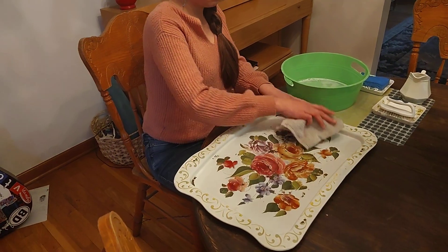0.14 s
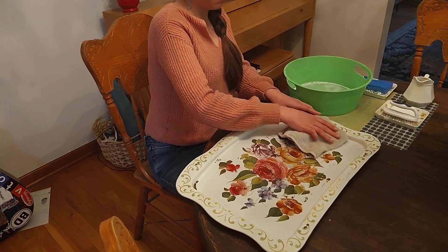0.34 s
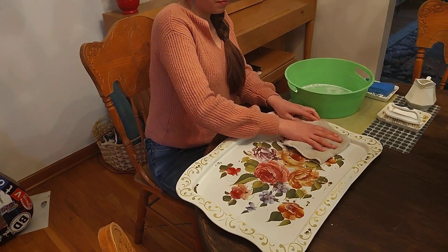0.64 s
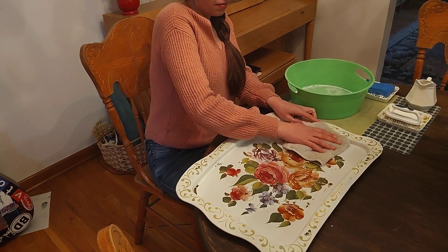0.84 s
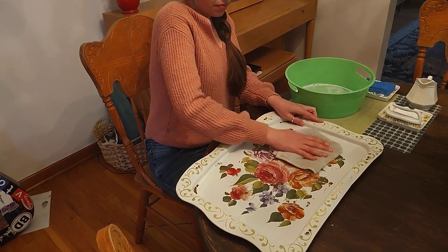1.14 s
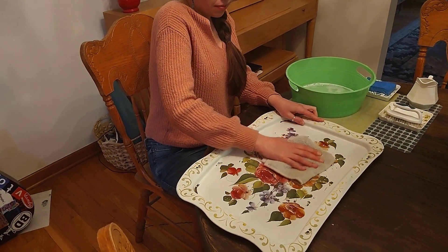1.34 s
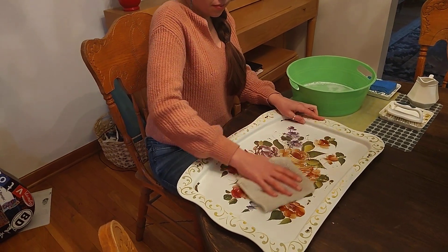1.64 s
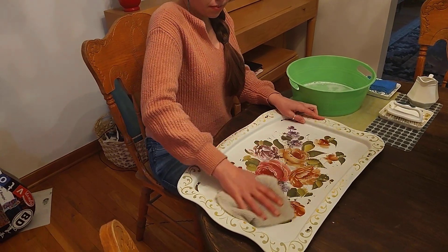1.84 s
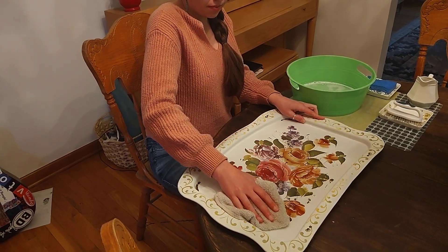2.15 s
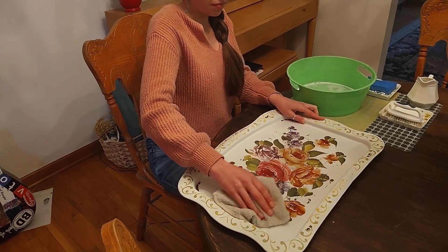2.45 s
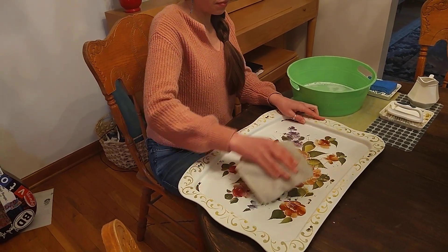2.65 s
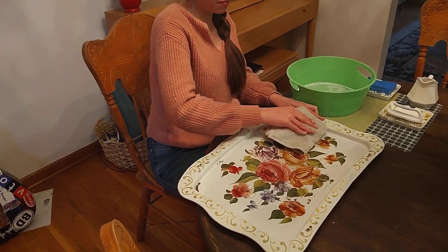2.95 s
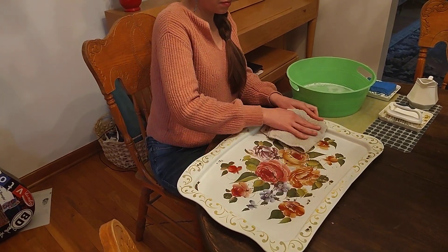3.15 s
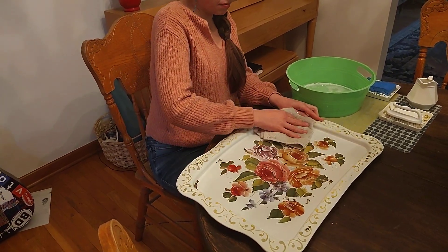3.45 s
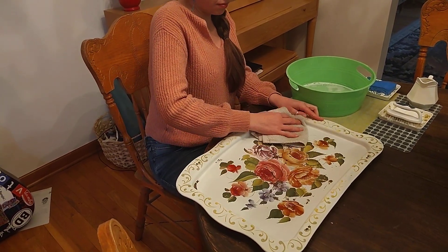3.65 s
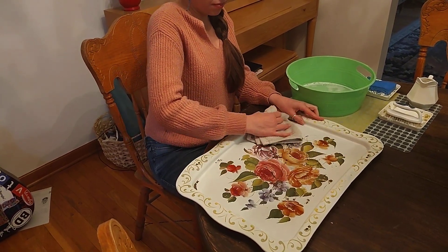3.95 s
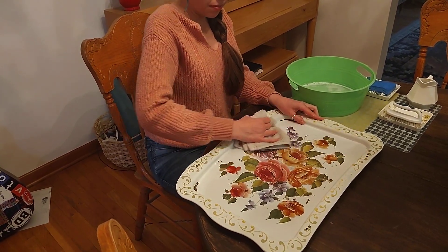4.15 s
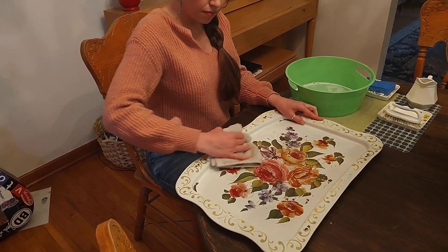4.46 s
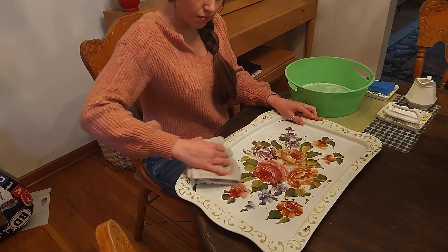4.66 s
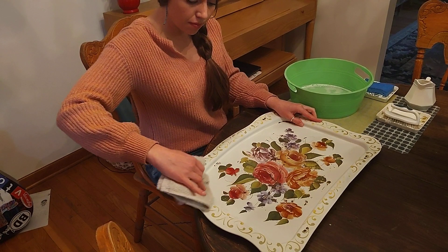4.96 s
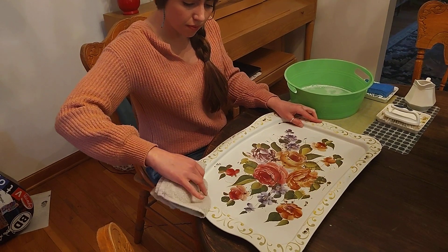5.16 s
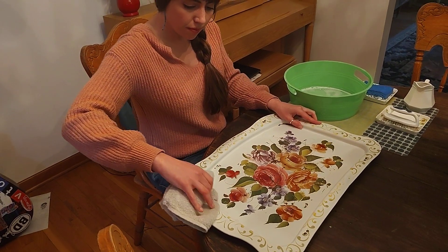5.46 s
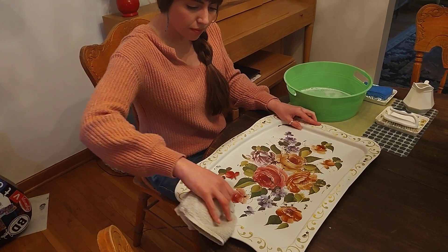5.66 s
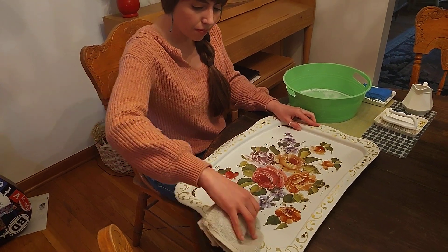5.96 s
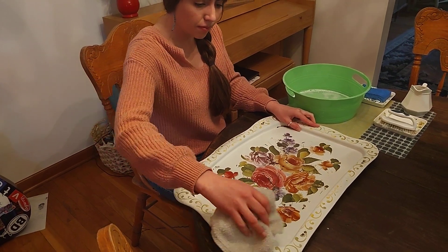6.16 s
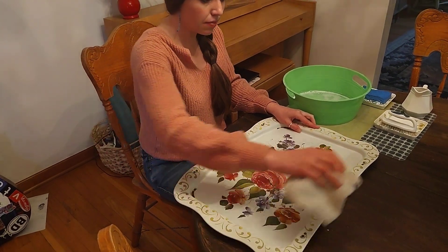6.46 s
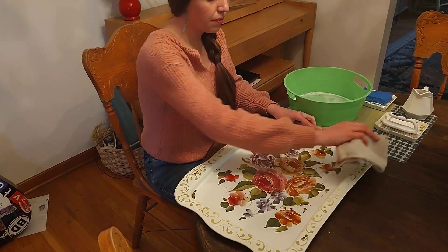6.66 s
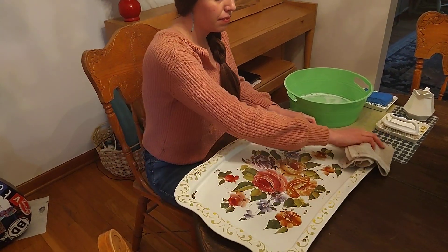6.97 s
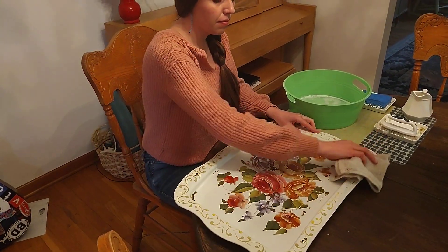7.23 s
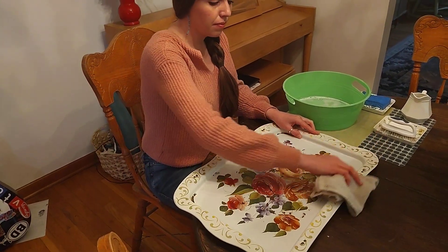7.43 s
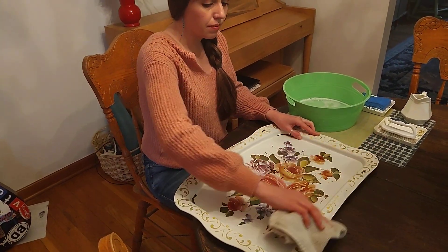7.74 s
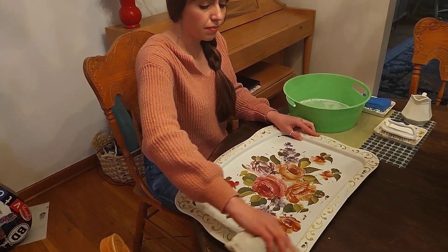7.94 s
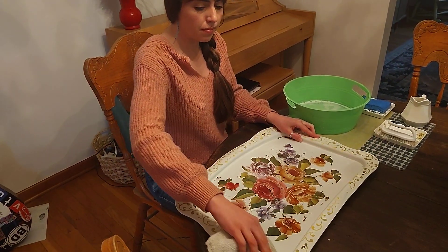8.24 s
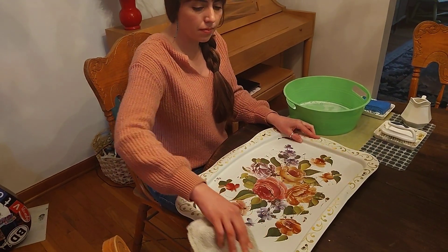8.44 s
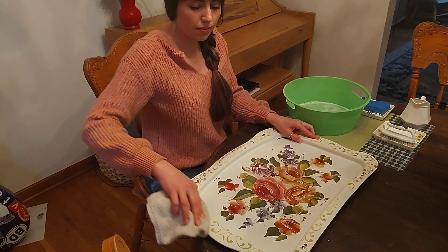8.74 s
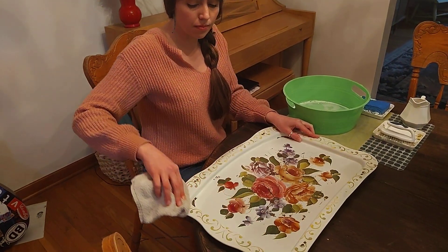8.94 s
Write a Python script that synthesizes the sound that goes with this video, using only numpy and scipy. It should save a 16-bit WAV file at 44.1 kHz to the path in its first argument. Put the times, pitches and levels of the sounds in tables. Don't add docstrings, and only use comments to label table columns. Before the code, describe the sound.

A quiet wooden room with faint low hum and soft hiss, heard closely in stereo, treble leaning right. For the first second a dry cloth barely whispers over a painted metal tray, with tiny ticks. From about 1.1 s the strokes swell into a strong, grainy hiss; a sharp snag snaps at 1.3 s, and around 1.6 to 1.85 s the sheet clanks, booms and rattles on the table. Rubbing drops away from 2 s, nearly still until small ticks at 3.15 s and a hard, bright knock near 3.4 s. Another dull clank and landing come at 4.2 s with a burst of wiping. Then softer, airier swishes follow the rim, with ticks at 5.05 and 6.1 s, a lull, a low thud at 6.9 s, steady light rubbing from 7.2 s, a knock and thud at 8.05 s, and last brushes and ticks near 8.9 s.

```python
import sys
import numpy as np
from scipy import signal
from scipy.fft import rfft, irfft
from scipy.io import wavfile
from scipy.ndimage import uniform_filter1d

SR = 44100
rng = np.random.default_rng(int(sys.argv[2]) if len(sys.argv) > 2 else 0)


def boost_factor(decibels):
    exponent = np.asarray(decibels, float) / 20
    return 10 ** exponent


def transcribe(signal):
    frames = np.atleast_2d(signal).T
    limited = np.clip(frames, -1, 1)
    pcm = np.round(limited * 32767).astype(np.int16)
    wavfile.write(sys.argv[1], SR, pcm)


N = 401310
SPAN = 2 ** 15


def evened(x):
    return x / np.sqrt(np.mean(x ** 2) + 1e-20)


def read(points, hz):
    f, value = np.transpose(points)
    return np.interp(np.log(hz + 1), np.log(f + 1), value)


def causal(points, size=4096):
    half_db = np.maximum(read(points, np.fft.rfftfreq(size, 1 / SR)), -60)
    half = half_db * np.log(10) / 20
    log_gain = np.r_[half, half[-2:0:-1]]
    taps = np.fft.ifft(np.exp(np.conj(signal.hilbert(log_gain)))).real[:size // 2]
    return taps / np.linalg.norm(taps)


def bell(hz, centre_hz, width_hz):
    return 1j * hz * width_hz / (centre_hz ** 2 - hz ** 2 + 1j * hz * width_hz)


def add(mix, s, sound):
    part = mix[:, round(s * SR):][:, :sound.shape[1]]
    part += sound[:, :part.shape[1]]


# (frequency [Hz], correlation)
MIC_LIKENESS = [(60, 0.94), (150, 0.95), (380, 0.71), (950, 0.25), (2380, 0.06), (5980, 0.027),
                (15000, 0.02)]


def pair_noise(field_db, size=512):
    hop = size // 2
    hz, t = np.fft.rfftfreq(size, 1 / SR), np.arange(N // hop + 5) * hop / SR
    a, b, c, d = rng.standard_normal((len(t), len(hz), 4)).T
    same = np.clip(read(MIC_LIKENESS, hz), -1, 1)[:, None]
    left = a + 1j * b
    right = same * left + np.sqrt(1 - same ** 2) * (c + 1j * d)
    z = np.array([left, right]) * boost_factor(field_db(hz[:, None], t))
    return signal.istft(z, window="cosine", nperseg=size, noverlap=size - hop)[1][:, :N]


# (frequency [Hz], level [dB per Hz])
ROOM_HISS = [(25, -30), (50, -19.5), (85, -5.5), (130, -7), (250, 0.5), (330, -3.5), (430, -4.5), (620, -9),
             (1000, -19.5), (1800, -17), (2600, -20), (5000, -24.5), (10000, -25.5), (16000, -25)]
# (frequency [Hz], level [dB])
APPLIANCE_HUM = [(91.5, -86), (258.4, -86), (296.1, -76), (355.3, -81), (414.5, -89)]


def quiet_room():
    t = np.arange(N) / SR
    hiss = pair_noise(lambda hz, frames: read(ROOM_HISS, hz) + 0 * frames, size=2048)
    floor = boost_factor(-69.5 - 5.5) * evened(hiss)
    pole = np.exp(-np.pi * 6 / SR)
    for hz, db in APPLIANCE_HUM:
        waver = .35 * evened(signal.lfilter([1], [1, -pole], rng.standard_normal((2, N))))
        in_phase = (1 + waver[0]) * np.cos(2 * np.pi * hz * t)
        floor = floor + boost_factor(db + 3.5) * (in_phase + waver[1] * np.sin(2 * np.pi * hz * t))
    return floor


# (start [s], end [s], fibre hiss at start [dB], at end [dB],
# pressure as sheet hiss [dB])
HAND_STROKES = [(0.0, 0.28, -76, -78, -70), (0.28, 0.88, -83, -86, -76), (0.88, 1.125, -83, -57, -65),
                (1.125, 1.4, -53, -50, -56.5), (1.4, 1.62, -48, -49, -50.5), (1.62, 1.955, -47, -56, -56),
                (1.955, 2.2, -72, -77, -76), (2.2, 2.55, -71, -76, -73), (2.55, 3.35, -77, -80, -80),
                (3.35, 3.6, -64, -71, -57), (3.6, 4.18, -71, -60, -68), (4.18, 4.43, -56, -57, -58.5),
                (4.43, 5.05, -57, -59, -69), (5.05, 5.5, -68, -61, -70), (5.5, 6.095, -60, -63, -71.5),
                (6.095, 6.92, -75, -76, -82), (6.92, 7.25, -75, -66, -72), (7.25, 8.0, -63, -63.5, -73),
                (8.0, 8.2, -62, -68, -66), (8.2, 8.85, -69, -56, -73), (8.85, 9.1, -60, -66, -73)]


def hand(t):
    arch_db, follow, change_s = 1.5, 0.3, 0.03
    strokes = np.transpose(HAND_STROKES)
    now = np.clip(np.searchsorted(strokes[0], t) - 1, 0, None)
    start, end, first_db, last_db, sheet_db = strokes[:, now]
    u = np.clip((t - start) / (end - start), 0, 1)
    move_db = (last_db - first_db) * (u - .5) + arch_db * np.sin(np.pi * u)
    levels = np.array([(first_db + last_db) / 2 + move_db, sheet_db + follow * move_db])
    return uniform_filter1d(levels, max(round(change_s / (t[1] - t[0])), 1), axis=1)


# (frequency [Hz], level [dB], t60 [s])
TRAY_MODES = [(131, -10, 0.17), (161.7, -15, 0.35), (207, -16.5, 0.11), (240, -11.5, 0.59),
              (320, -6.5, 0.099), (345, -8, 0.12), (419.1, -14, 0.19), (486.8, -13.5, 0.054)]


def tray_ring(share_db=-3.):
    t = np.arange(SR // 2) / SR
    modes = 0
    for hz, db, t60 in TRAY_MODES:
        modes = modes + boost_factor(db - 60 * t / t60) * np.sin(2 * np.pi * hz * t) / np.sqrt(t60)
    return (t == 0) + boost_factor(share_db) * modes / np.sqrt(SR) * 4


# (frequency [Hz], level [dB per Hz])
FIBRE_HISS = [(1100, -22), (1800, 2.5), (2500, -5), (3000, 3.5), (4100, 1.5), (4900, 3), (8800, 0.5),
              (11000, -1.5), (13000, -5.5), (15800, -11.5)]
# (frequency [Hz], level [dB])
SHEET_COLOUR = [(400, -29), (700, -6.5), (1100, -1), (1600, -1), (2000, -2), (2600, -10.5), (3600, -20.5)]
# (frequency [Hz], level [dB])
ROCK_COLOUR = [(60, -40.5), (100, -8.5), (140, -6.5), (210, -3.5), (330, -14.5), (500, -12), (800, -11),
               (1200, -36.5)]


def wipe(flicker_db=0.8, grit_db=1.5, patchy_db=1.1):
    def hiss(hz, t):
        patches = uniform_filter1d(rng.standard_normal((len(t), len(hz))).T, 8, 0)
        patches = evened(uniform_filter1d(patches, 10, 1))
        flicker = evened(uniform_filter1d(rng.standard_normal(len(t)), 3))
        fibre_db, sheet_db = hand(t)
        tilt = -3.1 - 0.4 * (sheet_db - fibre_db)
        fibres = read(FIBRE_HISS, hz) + fibre_db + tilt * np.log2(np.clip(hz, 1500, 16000) / 6000)
        fibres = fibres + 1.2 * np.minimum(tilt, 0) * np.log2(np.maximum(hz, 8000) / 8000)
        flat = read(SHEET_COLOUR, hz / 0.72) + np.where(t < 5.3, -1.5, -60)
        rim = read(SHEET_COLOUR, hz / 1.22)
        sheet = np.maximum(rim, flat) + sheet_db + 9.5
        both = 10 * np.log10(boost_factor(2 * fibres) + boost_factor(2 * sheet))
        return both + 2.74 + patchy_db * patches + flicker_db * flicker

    catches = uniform_filter1d(rng.exponential(1, N), 12)
    grit = evened(boost_factor(grit_db * catches * 4.4))
    rocking = pair_noise(lambda hz, t: read(ROCK_COLOUR, hz) + 0 * t, size=2048)
    rocking = evened(signal.oaconvolve(rocking, tray_ring(44.0)[None])[:, :N])
    rock_db, rock_per_db, rock_thud_db, rock_t60, deep_hz = -79.5, 0.65, -13, 1.6, 185
    t = np.arange(0, N / SR, .002)
    power = boost_factor(2 * (rock_db + rock_per_db * (hand(t)[1] + 72)))
    for s, boom_db, pitch_hz, _, _ in LANDINGS:
        fading_db = boom_db + rock_thud_db - 60 * abs(t - s) / rock_t60
        power = power + (t > s) * (pitch_hz < deep_hz) * boost_factor(2 * fading_db)
    rock_level = np.interp(np.arange(N) / SR, t, np.sqrt(power))
    return grit * pair_noise(hiss) / 18.7 + rocking * rock_level


# (frequency [Hz], t60 [s])
ROOM_DECAY = [(100, 0.2), (300, 0.77), (1000, 0.37), (3000, 0.3), (7000, 0.3), (14000, 0.29)]
# (delay [s], level [dB])
FIRST_ECHOES = [(.0021, -12), (.0037, -11), (.0075, -14), (.0128, -15)]


def room_tails(count=6, tail_db=3.5):
    taps = np.zeros((count, 2, SPAN // 2 + 8192))
    slots = np.arange(24, taps.shape[2] - 20, 4)
    at = slots + rng.integers(0, 4, (count, 2, len(slots)))
    np.put_along_axis(taps, at, rng.choice([-1., 1.], at.shape), 2)
    hz, t, z = signal.stft(taps, SR, nperseg=512)
    same = np.clip(read(MIC_LIKENESS, hz), -1, 1)[:, None]
    z[:, 1] = same * z[:, 0] + np.sqrt(1 - same ** 2) * z[:, 1]
    decay = boost_factor(-60 * t / read(ROOM_DECAY, hz)[:, None])
    tails = signal.istft(z * decay, SR, nperseg=512)[1][..., :taps.shape[2]]
    tails *= np.minimum(np.arange(taps.shape[2]) / 90, 1)
    tails *= boost_factor(tail_db) / np.linalg.norm(tails[:, :1], axis=2, keepdims=True)
    for delay, db in FIRST_ECHOES:
        where = np.round(delay * SR * rng.uniform(0.74, 1.2, (count, 2, 1))).astype(int)
        np.put_along_axis(tails, where, boost_factor(db), 2)
    return rfft(tails, SPAN)


# (time [s], snap [dB], sheet clank [dB], treble over snap [dB])
RIM_SNAGS = [(0.0159, -61, -80, -24), (0.512, -45.5, -56, -11), (1.1278, -26.5, -41, -12.5),
             (1.3172, -14.5, -28.5, -13.5), (1.6834, -28, -42, -17), (1.8453, -21, -55, -16),
             (2.5044, -46.5, -70, -11.5), (3.142, -44, -48, -13), (3.1623, -34.5, -40, -14.5),
             (3.5595, -32, -57, -14), (4.1697, -28.5, -42, -17), (4.2433, -28.5, -47, -14),
             (4.331, -31.5, -50, -15), (4.4612, -34, -55, -11), (4.9646, -43, -53, -17),
             (5.0452, -26, -47, -9.5), (6.096, -23, -43, -9.5), (6.244, -46.5, -69, -8.5),
             (6.276, -56.5, -75, -12), (7.014, -35, -54, -17), (7.1916, -39, -57, -14.5),
             (7.4016, -46, -63, -13), (7.463, -31, -53, -13), (7.5602, -30, -48, -10.5),
             (7.9992, -24.5, -43, -14), (8.8367, -30, -49, -9), (8.894, -30.5, -48.5, -9.5)]
# (time [s], snap [dB], clank [dB], clank centre [Hz])
SHEET_CLANKS = [(0.094, -75, -57, 1000), (0.289, -61, -46.5, 1600), (0.323, -62, -48, 1300),
                (0.5977, -70, -45.5, 1300), (1.617, -14.5, -26, 1750), (1.6545, -21.5, -29, 1080),
                (1.8534, -27.5, -34, 1500), (3.213, -56.5, -42.5, 1680), (3.267, -52.5, -48, 1630),
                (3.321, -53, -54, 1620), (3.3517, -26.5, -32.5, 1350), (3.6984, -55, -42, 1350),
                (3.8894, -58, -49, 1300), (3.9074, -44, -40, 1610), (3.919, -33.5, -38, 1500),
                (4.185, -21, -22.5, 1000), (4.1998, -40, -26, 1550), (5.73, -56, -50.5, 1700),
                (6.9196, -35, -41.5, 1650), (8.0263, -21.5, -32, 1800), (8.0546, -33, -33, 1350),
                (8.79, -58, -55, 1600)]
# (time [s], snap [dB], clank [dB], clank centre [Hz])
RIM_KNOCK = (3.3786, -5, -20.5, 1500)


def contacts():
    snags = [(s, snap_db, clank_db, 1850, 0.0026, treble_db)
             for s, snap_db, clank_db, treble_db in RIM_SNAGS]
    clanks = [(s, snap_db, clank_db, hz, 0.0021, -27 + 0.6 * max(snap_db - clank_db, 0))
              for s, snap_db, clank_db, hz in SHEET_CLANKS]
    return snags + clanks + [(*RIM_KNOCK, 0.00016, -18)]


# (frequency [Hz], level [dB])
SNAP_COLOUR = [(500, -22.5), (1000, -6.5), (1800, 0.5), (2600, 1.5), (4000, 2), (6500, 1), (9000, -4),
               (12000, -6), (13500, -16), (16000, -19.5)]


def ticks(tails, clank_width=0.72, shadow_db=-4.2, near_db=2.0):
    out, u, hz = np.zeros((2, N)), np.arange(3000) / SR, np.fft.rfftfreq(SPAN, 1 / SR)
    rows, snap = contacts(), rfft(causal(SNAP_COLOUR), SPAN)
    chance = rng.standard_normal((len(rows), 2, len(u)))
    for k, (s, snap_db, clank_db, clank_hz, length, treble_db) in enumerate(rows):
        burst = chance[k] * np.exp(-u / np.clip(length, .0001, .03)) * np.minimum(u / .0001, 1)
        burst = burst / np.linalg.norm(burst, axis=1, keepdims=True)
        burst = burst * boost_factor([[shadow_db], [0]])
        clank = bell(hz, clank_hz, clank_width * clank_hz) ** 2
        hardness = np.clip((treble_db + 16.0) / 6.8, -2, 2)
        slope = ((1 + 1j * hz / 5000) / 1.22) ** hardness
        heard = boost_factor(near_db) * rfft(burst, SPAN) + tails[k % len(tails)]
        bright = boost_factor(snap_db + 10.1) * snap * slope * heard
        dull = boost_factor(clank_db + 31.5) * clank * heard
        add(out, s, irfft(bright + dull, SPAN))
    return out


# (time [s], boom [dB], pitch [Hz], t60 [s], rattle [dB])
LANDINGS = [(0.287, -55, 253, 0.078, -56.5), (0.345, -48.5, 166.5, .25, -63), (0.511, -49.5, 160, 0.3, -67),
            (1.33, -53, 150, 0.15, -51), (1.44, -53, 140, .12, -49), (1.616, -60, 230, .15, -39),
            (1.64, -26, 590, 0.068, -38), (1.67, -40, 345, 0.16, -47), (1.70, -49, 152, .3, -56),
            (1.85, -52, 170, 0.3, -43), (3.158, -50.5, 126, 0.39, -55), (3.2, -53.5, 215.4, 0.44, -60),
            (3.353, -42.5, 170, .2, -43), (3.395, -40, 207, 0.25, -41.5), (3.699, -55, 131, 0.97, -55.5),
            (4.175, -50.5, 144, .5, -58), (4.2, -41, 493, 0.11, -38.5), (4.26, -38.5, 320, 0.096, -56),
            (6.919, -50, 190, .15, -52), (6.93, -46, 131, 1.05, -71), (7.0, -52, 225, 0.35, -78),
            (8.028, -44, 320, 0.16, -44), (8.08, -40.5, 305, 0.17, -48), (7.39, -62, 135, .5, -80)]
# (frequency [Hz], level [dB])
RATTLE_COLOUR = [(60, -31.5), (100, -7), (200, 4), (400, -1), (700, -1), (1000, -6), (1500, -29.5)]


def thuds(tails, wet_db=-9.0, rise=0.0039, rattle_t60=0.28):
    out, u = np.zeros((2, N)), np.arange(SPAN // 2) / SR
    colour = rfft(causal(RATTLE_COLOUR), SPAN)
    chance = rng.standard_normal((len(LANDINGS), len(u)))
    onset = 1 - np.exp(-u / rise)
    for k, (s, boom_db, pitch_hz, t60, rattle_db) in enumerate(LANDINGS):
        boom_level = boost_factor(boom_db - 60 * u / np.clip(t60, .04, 1.2))
        boom = boom_level * onset * np.sin(2 * np.pi * pitch_hz * u)
        rattle = boost_factor(rattle_db - 60 * u / rattle_t60) * onset * chance[k]
        body = rfft(boom, SPAN) + colour * rfft(rattle, SPAN)
        add(out, s, irfft(body * (1 + boost_factor(wet_db) * tails[k % len(tails)]), SPAN))
    return out


def scene():
    tails = room_tails()
    return quiet_room() + wipe() + ticks(tails) + thuds(tails)


def roll_off(x):
    return signal.sosfilt(signal.butter(12, 16970, fs=SR, output="sos"), x)


# (frequency [Hz], left over right [dB])
STEREO_LEAN = [(60, 3), (180, -0.5), (550, 1), (1650, -2.0), (4970, -1), (15000, -9)]


def record(dry):
    hz = np.fft.rfftfreq(N, 1 / SR)
    lean_db = read(STEREO_LEAN, hz) / 2
    heard = irfft(rfft(dry) * boost_factor([lean_db, -lean_db]), N)
    heard = 1.1 * np.tanh(heard / 1.1)
    band = 1 / (1 + (hz / 15820) ** 300) / (1 + (35 / (hz + 1)) ** 4)
    heard = irfft(rfft(heard) * band, N)
    return roll_off(1.016 * heard)


dry = scene()
out = record(dry)
transcribe(out)
```